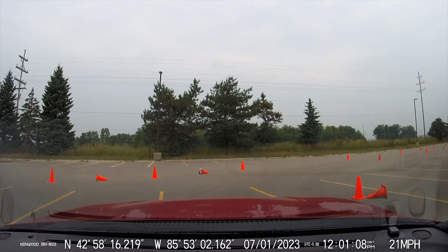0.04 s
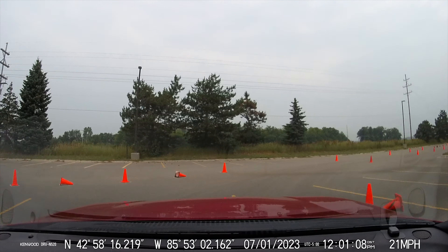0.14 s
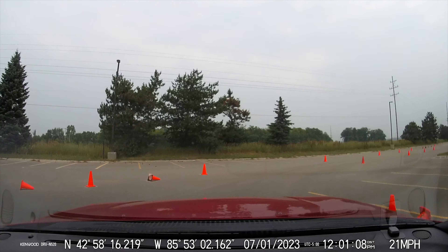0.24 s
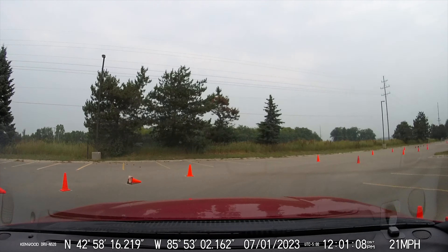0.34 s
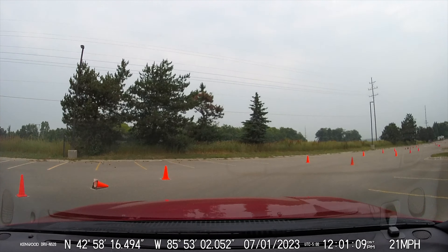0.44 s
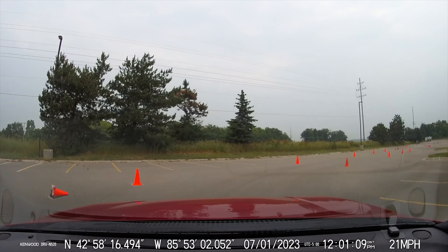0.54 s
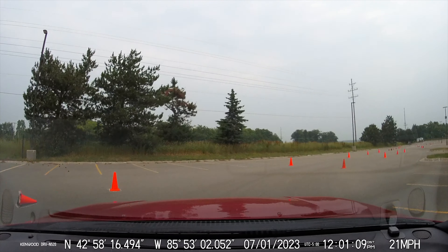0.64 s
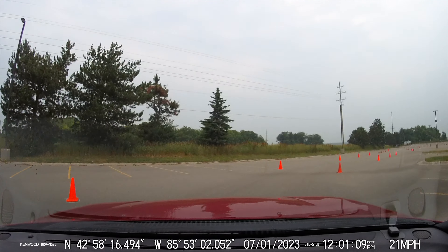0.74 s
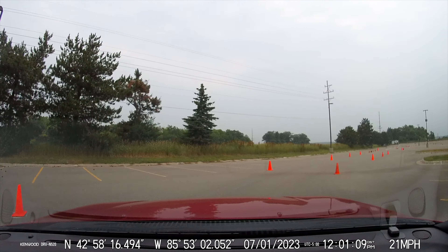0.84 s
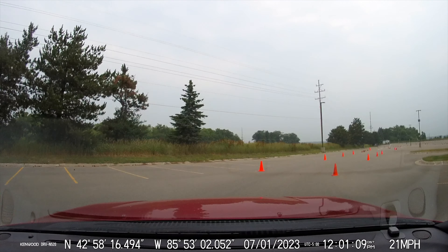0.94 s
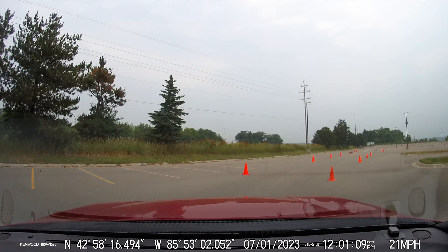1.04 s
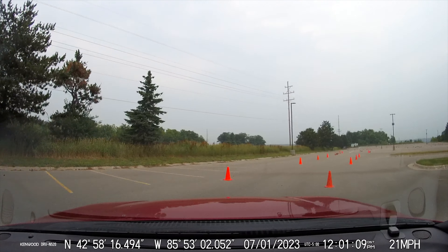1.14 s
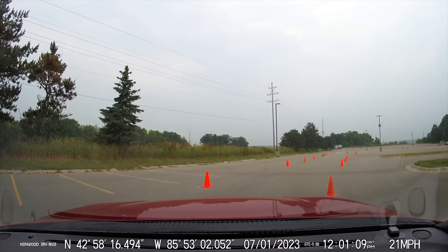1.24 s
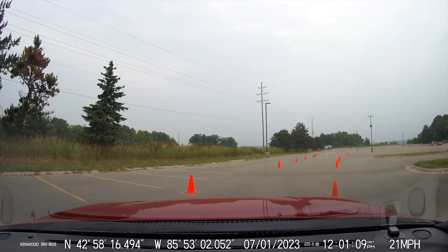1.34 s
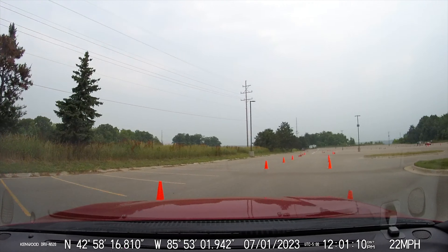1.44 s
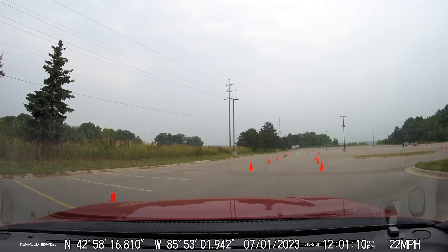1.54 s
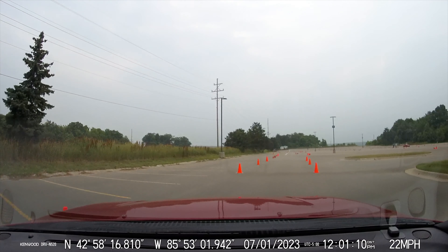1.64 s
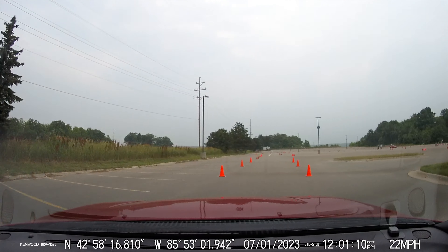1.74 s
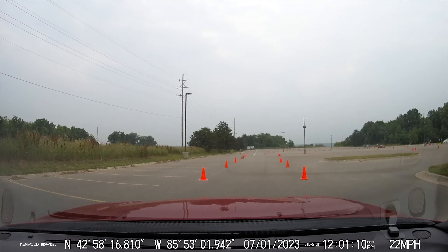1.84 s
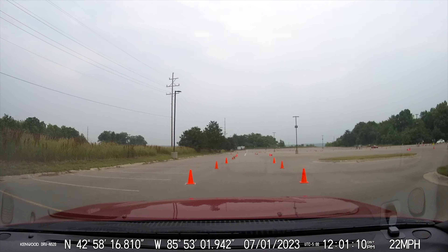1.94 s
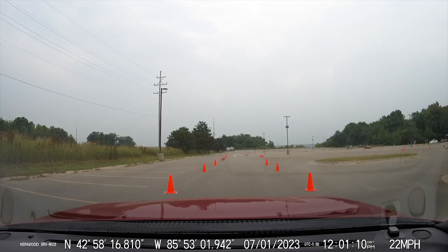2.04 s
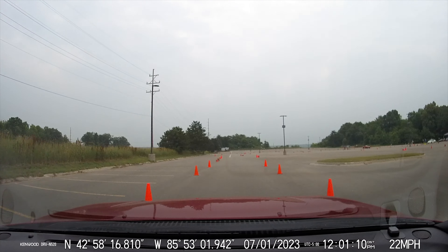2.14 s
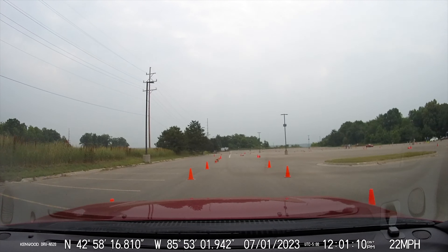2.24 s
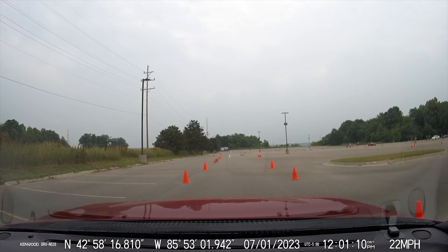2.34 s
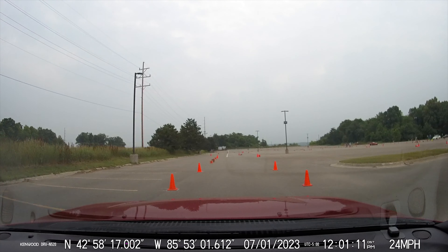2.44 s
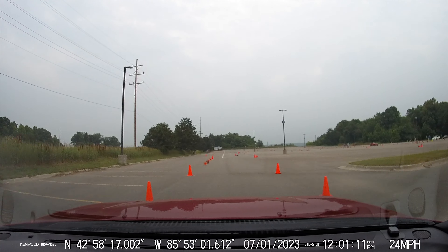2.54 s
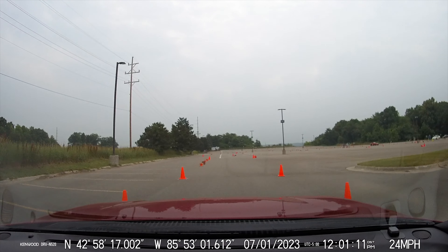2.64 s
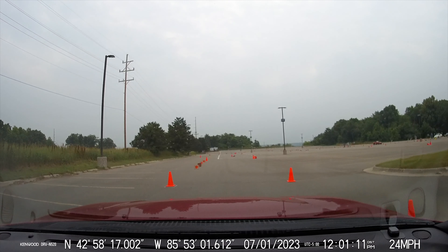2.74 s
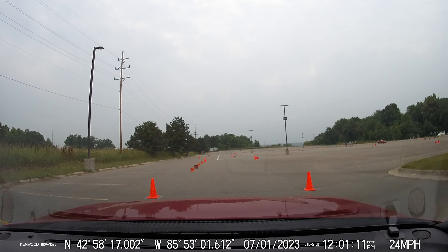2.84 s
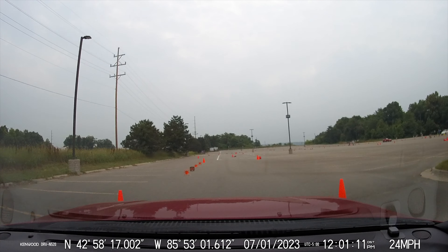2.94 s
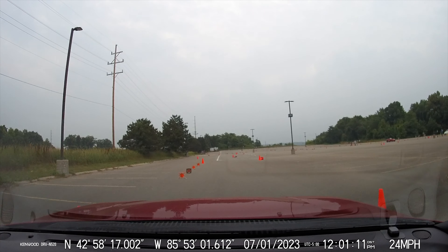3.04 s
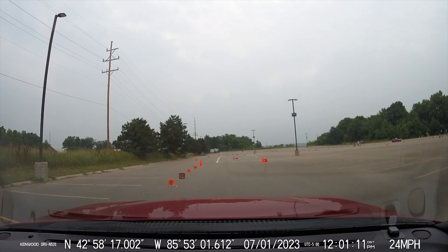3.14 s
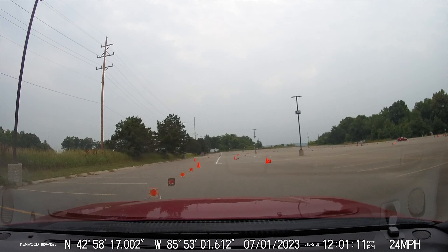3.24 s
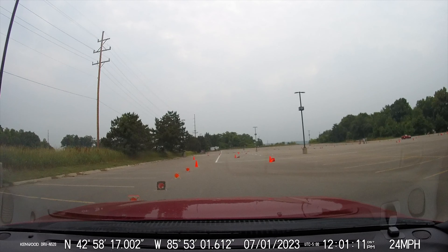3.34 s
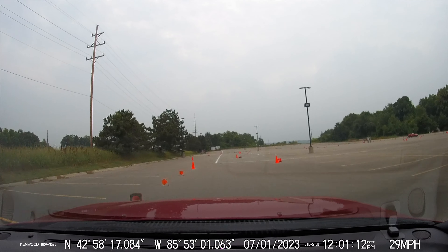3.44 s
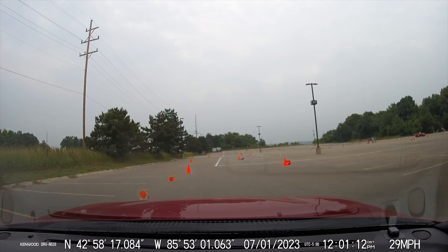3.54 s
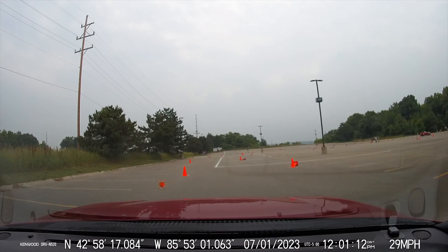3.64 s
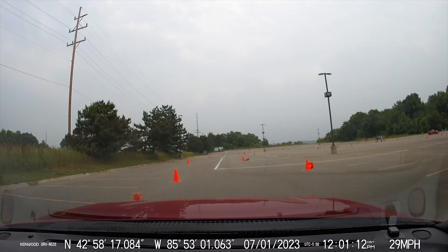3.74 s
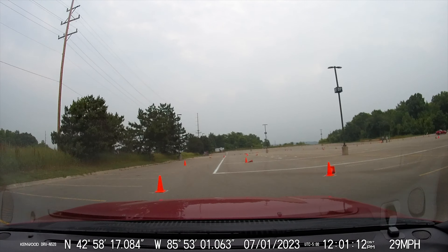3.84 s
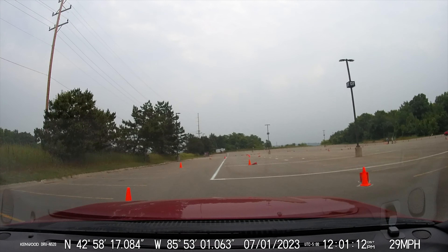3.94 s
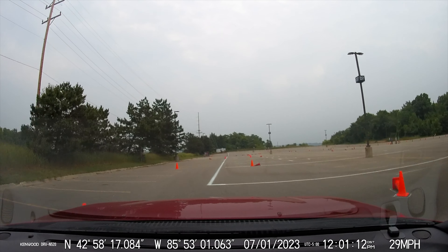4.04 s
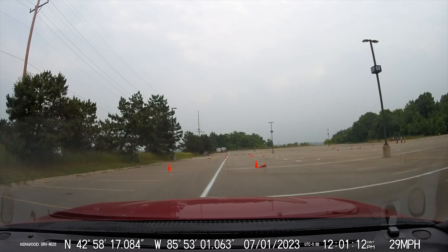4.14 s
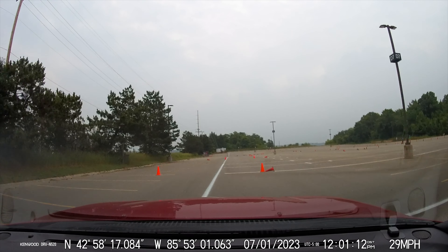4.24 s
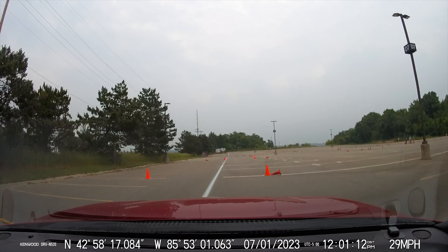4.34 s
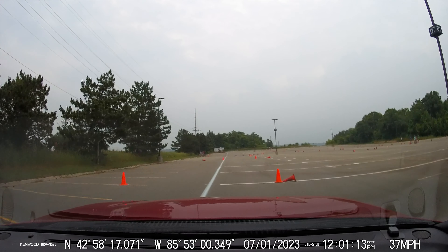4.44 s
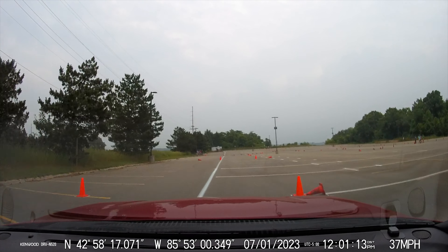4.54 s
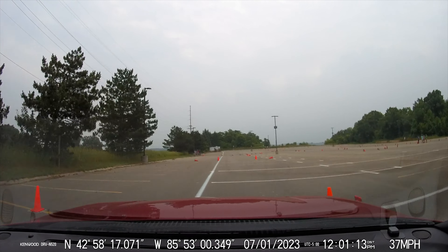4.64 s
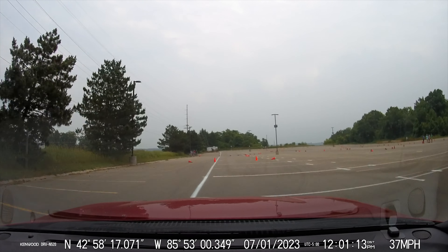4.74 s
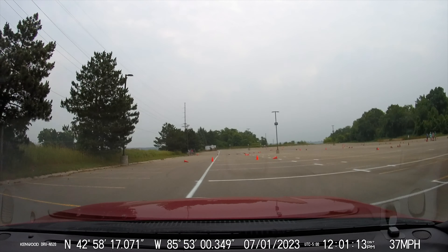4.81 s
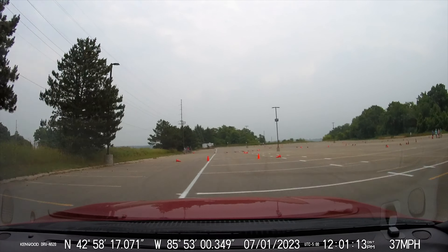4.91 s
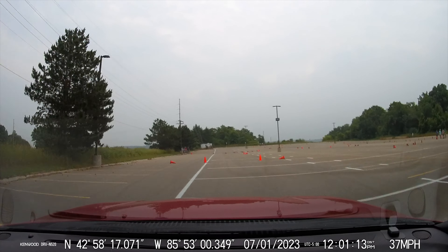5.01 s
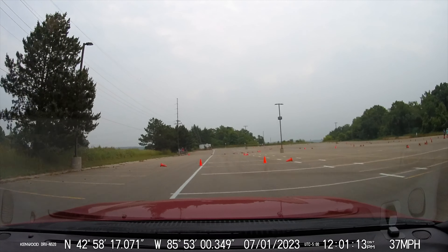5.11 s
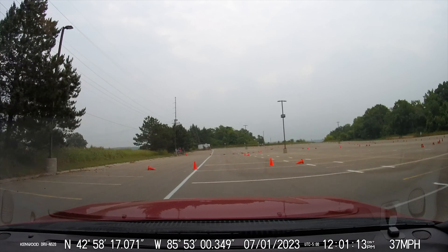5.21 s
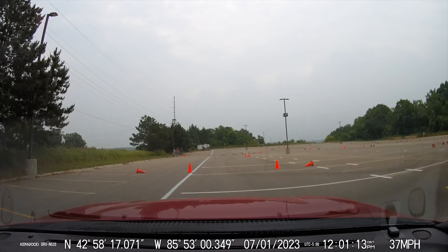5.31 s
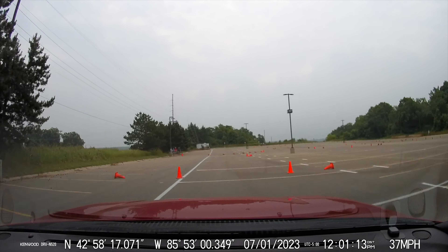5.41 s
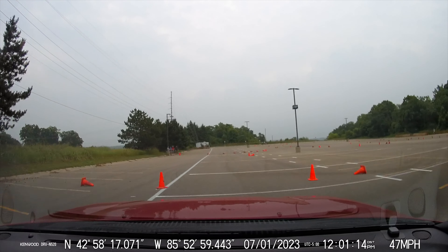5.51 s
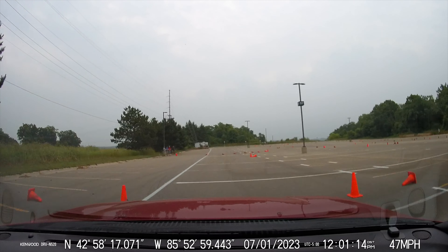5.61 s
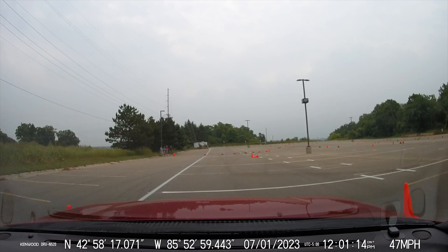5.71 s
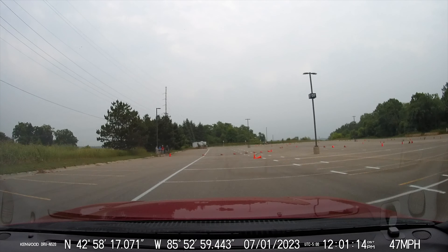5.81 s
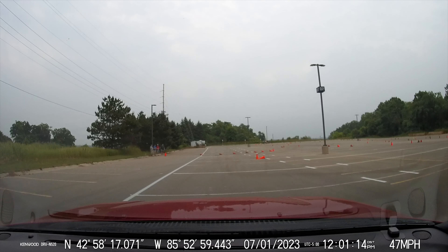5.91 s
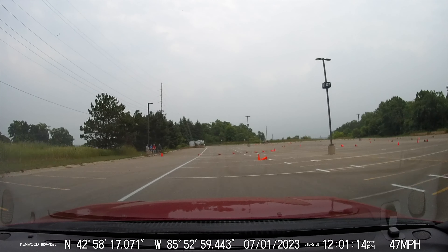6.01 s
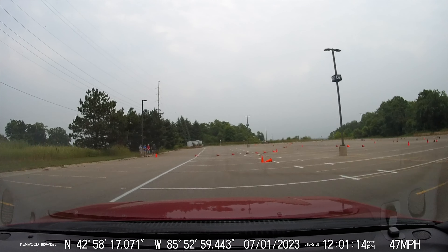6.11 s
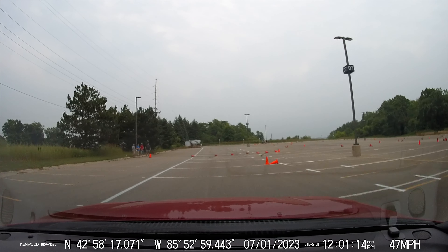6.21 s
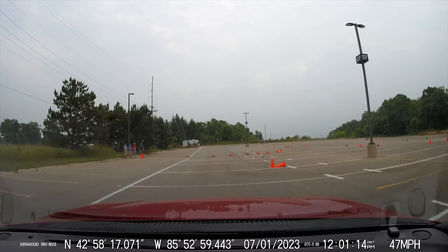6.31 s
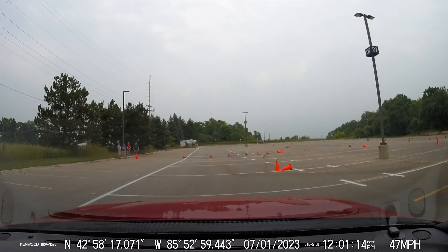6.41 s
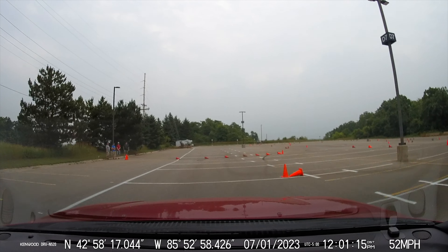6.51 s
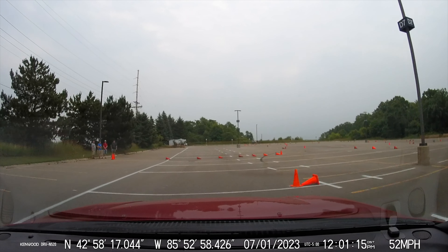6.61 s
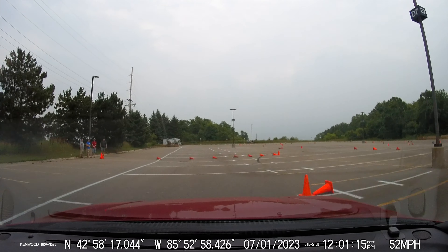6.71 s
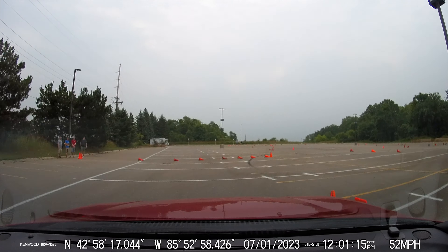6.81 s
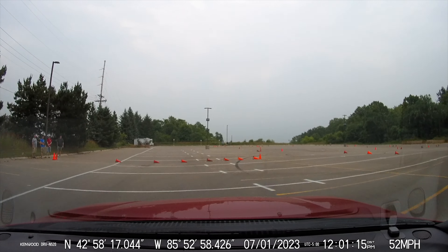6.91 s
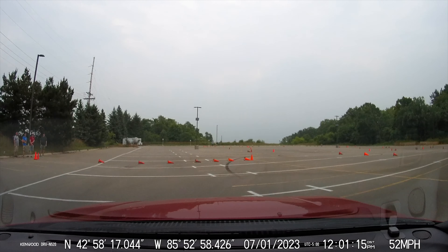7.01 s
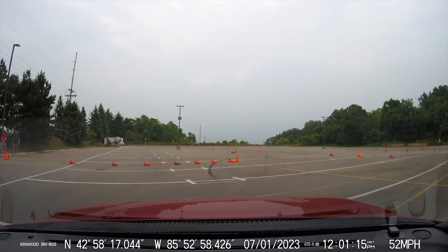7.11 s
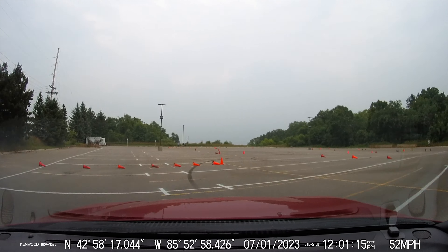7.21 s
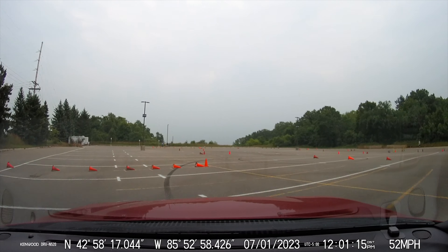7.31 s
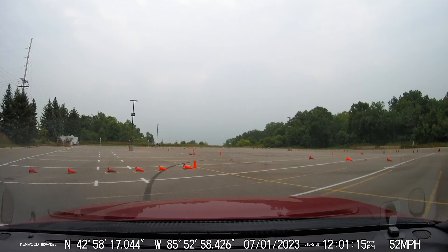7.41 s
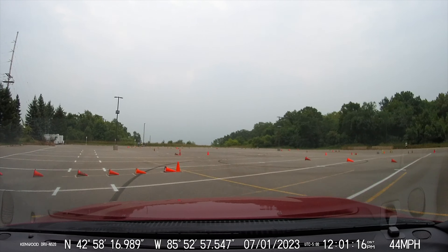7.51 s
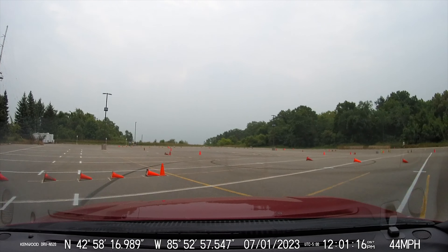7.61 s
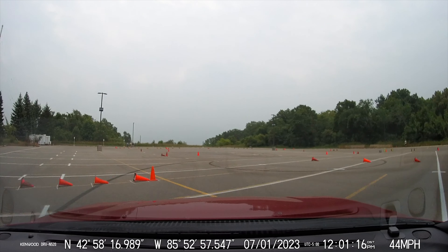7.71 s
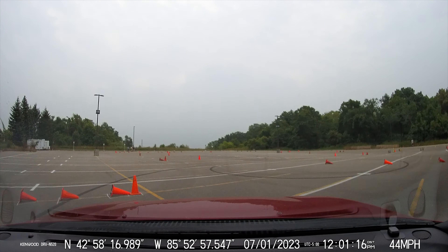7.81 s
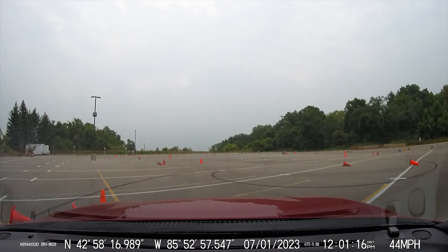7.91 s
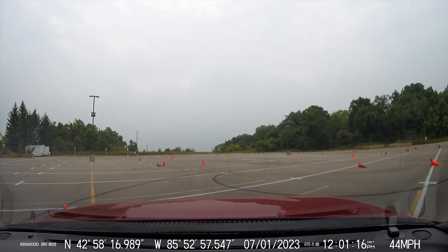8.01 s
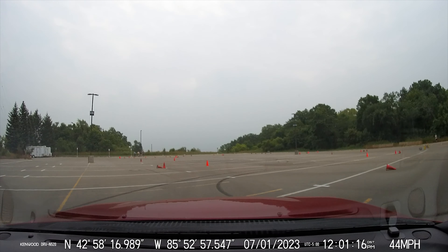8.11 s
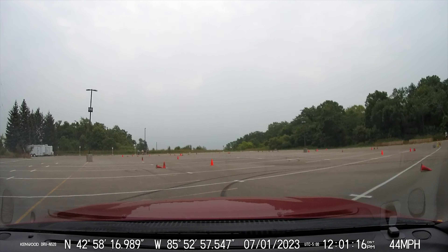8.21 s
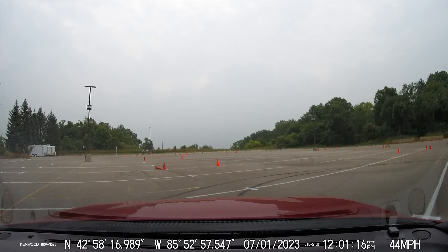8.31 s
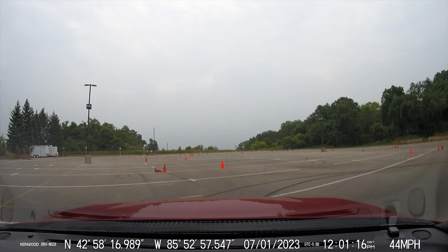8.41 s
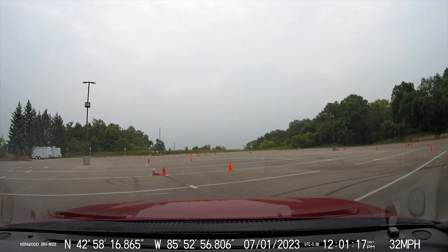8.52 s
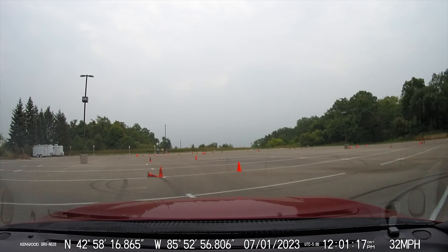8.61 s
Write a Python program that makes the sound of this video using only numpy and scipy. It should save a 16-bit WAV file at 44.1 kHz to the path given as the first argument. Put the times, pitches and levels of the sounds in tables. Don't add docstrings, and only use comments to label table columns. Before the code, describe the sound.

Inside a turbocharged six-cylinder car on a parking lot cone course, heard close and dull from the dashboard. At 0 s the engine drones low over road rumble, with a short tire chirp, small plastic ticks and light trim knocks. From about 0.8 to 2.1 s the tires squeal thinly and unevenly through a corner, with a faint mechanical whine. From 2.3 s the engine pulls hard, its growl rising steadily to a peak near 4.7 s, with faint compressor breath. At 4.8 s the throttle lifts with a soft bump, a rush of air and a faint falling whistle. The engine sinks on overrun, with panel knocks around 6 s. From 6.7 to 7.8 s the tires screech loudly under braking, several rough tones overlapping. Throttle blips jump up from 7.3 s to the end near 8.6 s, amid sharp knocks and ticks.

```python
import sys
import numpy as np
from scipy import signal
from scipy.fft import rfft, irfft, next_fast_len
from scipy.io import wavfile

SR = 44100
rng = np.random.default_rng(int(sys.argv[2]) if len(sys.argv) > 2 else 0)


def digitize_waveform(pressure):
    field = np.atleast_2d(pressure).T
    bounded = np.clip(field, -1, 1)
    quanta = np.round(bounded * 32767).astype(np.int16)
    wavfile.write(sys.argv[1], SR, quanta)


def volts(x):
    e = np.asarray(x, float) / 20
    return 10 ** e


N = 381906

# (time [s], speed [turns/s])
CRANK = [(0.0, 40.25), (0.36, 42.79), (1.09, 43.29), (1.18, 44.97), (2.08, 54.7), (2.32, 53.9),
         (2.98, 63.5), (3.59, 72.85), (4.71, 93.18), (4.96, 90.11), (5.47, 87.55), (5.81, 83.86),
         (6.02, 78.8), (6.36, 69.04), (6.76, 61.76), (6.92, 55.71), (8.19, 57.15), (8.66, 64.11)]


def rms_one(x):
    return x / np.sqrt(np.mean(np.abs(x) ** 2) + 1e-20)


def in_time(rows):
    s, *columns = np.transpose(rows)
    return [np.interp(np.arange(N) / SR, s, c) for c in columns]


def at_hz(points, hz):
    points_hz, level_db = np.transpose(points)
    return np.interp(np.log(hz), np.log(points_hz), level_db)


def swells(rows):
    t = np.arange(N) / SR
    return sum(size * np.interp(t, [s - rise, s, s + hold, s + hold + fall], [0, 1, 1, 0])
               for s, size, rise, hold, fall in rows)


def drift(rate_hz):
    r = np.exp(-2 * np.pi * rate_hz / SR)
    return rms_one(signal.lfilter([1], [1, -2 * r, r * r], rng.standard_normal(N + SR))[SR:])


def shifted(slow, samples):
    return np.roll(np.r_[slow, slow[::-1]], samples)[:N]


def band(x, low_hz, high_hz):
    return signal.sosfilt(signal.butter(2, [low_hz, high_hz], "band", fs=SR, output="sos"), x)


def dulled(x, cut_hz):
    return signal.sosfilt(signal.butter(6, cut_hz, fs=SR, output="sos"), x)


def turning(hz):
    return np.exp(2j * np.pi * np.cumsum(hz) / SR)


def narrow_noise(hz, width_hz, tone):
    waver = rms_one(tone + drift(width_hz) + 1j * drift(width_hz))
    return np.sqrt(2) * np.real(waver * turning(hz))


def burst(t60_s, rise_s):
    t = np.arange(round(.12 * SR)) / SR
    return rng.standard_normal(len(t)) * volts(-60 * t / t60_s) * (1 - np.exp(-t / rise_s))


def crank():
    # (time at the top [s], size [turns/s], rise [s], hold [s], fall [s])
    surges = [(2.419, 0.739, 0.125, 0.004, 0.362), (3.477, 2.625, 0.091, 0.005, 0.151),
              (4.748, -1.6, .014, .001, .05), (4.805, -8.2, 0.075, 0.012, 0.075),
              (4.84, 2.3, .02, 0.001, .02), (4.863, -2.8, .02, 0.001, .09),
              (6.981, -2.13, 0.062, 0.012, 0.077), (7.323, 5.858, 0.119, 0.189, 0.081),
              (7.754, 5.952, 0.109, 0.01, 0.189), (8.026, 4.486, 0.139, 0.007, 0.138),
              (8.35, 6.498, 0.128, 0.028, 0.141)]
    return in_time(CRANK)[0] + swells(surges)


def loads_db():
    # (time [s], firing orders [dB], other orders re firing [dB], tilt [dB/octave])
    load = [(0, -46, -14.5, -3.5), (1.1, -54, -17.5, 0), (1.25, -51.5, -9.5, -.5), (2.0, -48, -10.5, 0.5),
            (2.3, -45.5, -9.5, -1), (2.85, -45.5, -8.5, 3), (3.6, -39, -14, -2), (4.25, -42.5, -8, -1.5),
            (4.7, -49.5, -3.5, -3), (4.85, -52, -12.5, 3.5), (5.75, -54.5, -12, 1), (6.0, -45, -18, -5.5),
            (6.6, -60, -16, -3), (7.2, -54.5, -12.5, -4.5), (7.45, -49, -10, 5.5), (7.75, -47.5, -11, 0),
            (8.05, -45.5, -24, -4.5), (8.35, -47, -11.5, 2.5)]
    # (time [s], level [dB], rise [s], hold [s], fall [s])
    fuel_cuts = [
        (7.6, -17, 0.073, 0.0061, 0.11),
        (8.1, -15, 0.11, 0.037, 0.24),
    ]
    # (time [s], level [dB], rise [s], hold [s], fall [s])
    stumbles = [
        (3.5, 10, 0.18, 0.23, .2),
        (5.3, 15, 0.74, 0.14, 0.23),
        (7.3, 15.5, 0.11, 0.066, 0.063),
        (8.4, -17, .2, .3, 0.098),
    ]
    half_orders_db = -7
    firing, uneven, tilt = in_time(load)
    firing = firing + swells(fuel_cuts)
    whole = firing + uneven
    return firing, whole, whole + half_orders_db + swells(stumbles), tilt


def engine(waver_db, spread_rad):
    # (multiple of crank speed [1], level [dB])
    engine_orders = [(1.0, 21), (1.5, 9.5), (2.0, 17.5), (2.5, 2.5), (3.0, 15), (3.5, -3), (4.0, 5.5),
                     (4.5, 10), (5.0, 11.5), (5.5, 5), (6.0, 0.63), (6.5, -7), (7.0, 2), (7.5, 0), (8.0, 4),
                     (8.5, -8.5), (9.0, -2.5), (9.5, -3), (10.0, -4), (10.5, -3.5), (11.0, 2.5),
                     (11.5, -19.5), (12.0, -11), (12.5, -5.5), (13.0, -1)]
    # (frequency [Hz], level [dB])
    cabin = [(40.0, -37), (70.0, -10), (110.0, -6), (175.0, 5), (230.0, -6), (290.0, 0), (370.0, 9),
             (430.0, 3), (500.0, 9.5), (600.0, 8), (700.0, 8.5), (850.0, -3), (1000.0, 13), (1200.0, 3.5)]
    # (frequency [Hz], width [Hz], level [dB])
    cabin_modes = [(108, 9.9, 4.5), (125.8, 14, -14), (381.2, 3.1, 4.5), (478.8, 11, 7.5), (559, 1.7, 5.5),
                   (608, 18, 2), (717.6, 10, 7.5), (785, 14, 2.5)]
    # (multiple [1], level [dB])
    coasting = [(1, 3), (3, 2), (4, 9), (5.5, -5), (6, 0), (7, 12), (8, 4), (9, 6), (12, 2)]
    coasting_s = 4.82, 6.9
    # (multiple [1], time [s], level [dB], half length [s])
    order_swells = [(1, 6.1, -10, .2), (1.5, 4.5, 12, .2), (1.5, 5.7, -10, .25), (2, 3.2, -4, .15),
                    (3, 3.96, -6.5, 0.13), (3, 4.65, -2.5, 0.28), (3.5, 4.5, 12, 0.37), (3.5, 4.5, 9, .2),
                    (4, 2.5, 7.5, 0.24), (4, 2.8, 4.5, .15), (4, 4.1, 5.5, 0.21), (4, 5.31, 7, 0.19),
                    (4, 6.45, 14, 0.24), (4.5, 2.2, -4, 0.22), (4.5, 5.2, -5.5, .3), (5, 2.4, -12, 0.25),
                    (5, 4.25, -9.5, .15), (5, 4.4, 9.5, 0.28), (6, 3.6, 3, .1), (6, 4.05, 5, .06),
                    (6, 4.55, 7, 0.19), (6, 4.8, -12, 0.16), (6, 7, 12.5, .12), (6.5, 3.1, 9, .4),
                    (6.5, 4.1, 8, .3), (7, 2.7, -12, 0.18), (7, 5.8, -6.5, .2), (8, 2.5, -4, .2),
                    (8, 3.5, 3.5, 0.22), (8, 5.6, -5, 0.25), (8, 6.9, 8, .2), (8.5, 3.1, 10, 0.43),
                    (9, 3.41, -12, 0.14), (9, 4.8, 8.5, 0.1), (9.5, 3.5, 5, .2), (10, 3.5, 8, 0.41),
                    (10, 4.0, 16.5, .12), (10, 4.6, 14, .12), (11, 2.6, -11, .15), (12, 2.5, 5, 0.28),
                    (9, 7.85, 7, .15), (8, 7.45, -7, .15), (9, 7.6, -14, 0.2), (10, 7.8, 12, 0.16),
                    (8, 8.45, -8, .12), (4.5, 4.42, -9, .15), (9, 7.32, 4, 0.13), (3, 4.9, 4, 0.15),
                    (4, 6.1, 5, 0.073), (3, 6.0, -3.5, 0.11)]

    speed = crank()
    angle = 2 * np.pi * np.cumsum(speed) / SR
    loads = loads_db()
    wandering = drift(.35)
    wavers = [drift(3.1) + 0.8 * drift(25.0) for _ in range(3)]
    coarse = np.arange(0, N, 64)
    coarse_s = coarse / SR
    shut = np.interp(coarse_s, np.repeat(coasting_s, 2) + [0, .1, 0, .1], [0, 1, 1, 0])
    out = 0
    for k, (order, level_db) in enumerate(engine_orders):
        half_steps = round(2 * order)
        hz = order * speed[coarse]
        cabin_db = at_hz(cabin, hz)
        for mode_hz, width_hz, db in cabin_modes:
            cabin_db = cabin_db + db / (1 + (2 * (hz - mode_hz) / width_hz) ** 2)

        kind = 0 if half_steps % 6 == 0 else 1 + half_steps % 2
        load_db = loads[kind][coarse] + dict(coasting).get(order, 0) * shut
        load_db = load_db + loads[3][coarse] * np.log2(max(order / 3, 1))
        for multiple, s, db, half_s in order_swells:
            if multiple == order:
                load_db = load_db + db * np.exp(-((coarse_s - s) / half_s) ** 2)

        lag = np.interp(np.arange(N), coarse, spread_rad * shifted(wandering, 47000 * k)[coarse])
        waver = shifted(wavers[k % 3], 9000 * k)[coarse]
        rough_db = waver_db * (1 + 1.1 * shut) * np.sqrt(half_steps) * waver
        gain = np.interp(np.arange(N), coarse, volts(level_db + load_db + cabin_db + rough_db))
        out = out - gain * np.cos(order * angle + lag)
    return np.sqrt(2) * out


def squeal(spans, width_hz, tone, wander_hz, chatter_db, strands, octave_db):
    out, t = 0, np.arange(N) / SR
    for rows in spans:
        hz, level_db = in_time(rows)
        live = np.clip(np.minimum(t - rows[0][0], rows[-1][0] - t) / .02, 0, 1)
        slip_hz = hz + wander_hz * drift(14.1)
        slip = volts(chatter_db * drift(23.0)) * narrow_noise(slip_hz, width_hz, tone)
        ribs = 0
        for ratio, db in strands:
            rib_hz = ratio * hz + 1.5 * wander_hz * drift(6.0)
            ribs = ribs + volts(db + 2.4 * drift(1.1)) * narrow_noise(rib_hz, width_hz, tone)
        octave = volts(octave_db) * band(narrow_noise(2 * hz, 2.1 * width_hz, .2), 2000, 3600)
        out = out + live * volts(level_db) * (dulled(slip + ribs, 2100) + octave)
    return dulled(out, 4100)


def glide_tracks():
    # (start [s], length [s], from [Hz], to [Hz], level
    # [dB])
    glides = [(0.151, 0.55, 2000, 2016, -61), (0.636, 0.013, 2430, 2320, -48),
              (1.872, 0.033, 1765, 1710, -36), (1.916, .045, 1740, 1800, -38),
              (1.885, .012, 2523, 2530, -49), (1.925, 0.015, 1950, 2020, -46.5),
              (1.93, .012, 2520, 2520, -50), (6.831, .1, 2966, 2840, -50), (6.841, .1, 2430, 2470, -58.5),
              (7.08, 0.027, 2474, 2400, -56), (7.165, .05, 1454, 1457, -33), (7.171, .13, 2330, 2365, -51),
              (7.224, 0.058, 1423, 1390, -27), (7.239, 0.029, 1318, 1310, -29),
              (7.33, 0.028, 1411, 1430, -29.5), (7.362, 0.054, 1719, 1685, -49),
              (7.453, 0.068, 1628, 1593, -36), (7.46, 0.054, 1716, 1690, -39.5),
              (7.52, 0.032, 1363, 1350, -28), (7.544, 0.038, 1565, 1503, -31.5),
              (7.549, .05, 2353, 2330, -52), (7.605, 0.043, 1433, 1426, -26.5),
              (7.658, .04, 2430, 2450, -60), (7.673, 0.042, 1420, 1387, -35.5)]
    # (start [s], length [s], from [Hz], to [Hz], level [dB])
    low_glides = [
        (6.84, .03, 1089, 1100, -35),
        (6.94, .1, 1095, 1135, -26),
        (7.108, 0.058, 1130, 1085, -24),
        (7.245, .045, 1130, 1136, -25.5),
        (7.479, 0.031, 1147, 1130, -27),
        (7.589, 0.041, 1150, 1138, -25.5),
    ]
    edge_s, edge_db = .025, -18
    shapes = []
    for s, length, from_hz, to_hz, db in glides + low_glides:
        end = s + length
        shapes.append([(s - 1.2 * edge_s, from_hz, -90), (s - edge_s, from_hz, db + edge_db),
                       (s, from_hz, db), (end, to_hz, db),
                       (end + edge_s, to_hz, db + edge_db), (end + 1.2 * edge_s, to_hz, -90)])
    high, low = shapes[:len(glides)], shapes[len(glides):]
    return [sum(high[k::4], []) for k in range(4)] + [sum(low, [])]


def tyres():
    # (time [s], pitch [Hz], level [dB])
    slides = [
        [(0.06, 1290, -53), (0.085, 1300, -42), (0.15, 1274, -38), (0.175, 1250, -54)],
        [(.78, 1171, -51), (.9, 1283, -40.5), (1.0, 1162, -49.5), (1.2, 1185, -45), (1.5, 1170, -46),
         (1.74, 1222, -37), (1.98, 1240, -37), (2.1, 1320, -36), (2.16, 1350, -49)],
        [(6.69, 1178, -44), (6.8, 1232, -33.5), (6.94, 1197, -27.5), (7.1, 1210, -26), (7.33, 1188, -29.5),
         (7.44, 1216, -30), (7.62, 1191, -29.5), (7.715, 1234, -32.5), (7.8, 1255, -46)],
    ]
    # (time [s], level [dB])
    grabs = [(.9, 2.5), (1.185, 11), (1.225, -3), (1.255, 6), (1.29, 19.5), (1.325, 16), (1.35, 9.5),
             (1.485, 22), (1.41, 4), (1.59, -6), (1.79, -4.5), (1.76, 10), (1.815, 9), (1.89, 13.5),
             (1.95, 8.5), (1.92, 0.5), (1.98, -4), (2.008, 11), (2.05, 3.5), (2.1, 0.5), (6.76, 3.5),
             (6.888, 4.5), (6.936, 7), (6.99, -2), (7.05, 4.5), (7.087, 5.5), (7.14, -7.5), (7.172, 7),
             (7.25, -6), (7.308, 5.5), (7.338, 2.5), (7.41, 4), (7.44, 1), (7.49, -1), (7.525, 6.5),
             (7.555, -4), (7.69, 4), (7.718, 1)]
    rise_s, fall_s = .03, .035
    grabs_db = swells([(s, db, rise_s, 0, fall_s) for s, db in grabs])
    main = squeal(slides[:2], width_hz=45, tone=2.6, wander_hz=9, chatter_db=0.0,
                  strands=[(.91, -17), (1.07, -10)], octave_db=-42)
    main += squeal(slides[2:], width_hz=55, tone=1.9, wander_hz=11, chatter_db=1.0,
                   strands=[(.9, -9), (1.09, -7), (1.3, -31)], octave_db=-35)
    others = squeal(glide_tracks(), width_hz=45, tone=1.7, wander_hz=10, chatter_db=1.5,
                    strands=[(1.06, -11)], octave_db=-42.0)
    return volts(grabs_db) * main + others


def knocks(body_t60_s, bright_t60_s):
    # (time [s], peak [dB], pitch [Hz], bright part [dB])
    hits = [(0.268, -20.5, 1020, -80), (0.461, -19, 970, -52), (0.465, -15.5, 1140, -51),
            (2.3925, -14, 1024, -54.5), (2.841, -10.5, 587, -57), (4.203, -18.5, 526, -63),
            (4.914, -14, 600, -71), (6.0065, -16, 1003, -47), (6.012, -8.5, 1015, -60),
            (6.022, -17, 1160, -66), (6.736, -15, 1210, -74), (6.981, -14, 760, -71.5),
            (7.93, -11, 633, -69), (7.935, -23, 1130, -71), (8.0705, -6.5, 994, -59),
            (8.0706, -24, 1360, -62), (8.528, -39, 555, -53.5)]
    out, t = np.zeros(N + SR), np.arange(round(.12 * SR)) / SR
    for s, peak_db, hz, bright_db in hits:
        ringing = np.sin(2 * np.pi * hz * t) * volts(-60 * t / body_t60_s) * 1.4 * (1 - np.exp(-t / 0.0012))
        bounce = 0.24 * np.roll(ringing, round(0.0075 * SR))
        thud = 1.5 * band(burst(0.057, 0.0015), 420, 1300)
        body = dulled(ringing + bounce + thud, 1600)
        rattle = burst(bright_t60_s, .0005) + 1.2 * burst(.012, .0003)
        rattle = dulled(band(rattle, 1900, 4000), 3700)
        at = round((s - .0005) * SR)
        out[at:at + len(t)] += volts(peak_db - 2.0) * body + volts(bright_db + 13.5) * rattle
    return out[:N]


def thumps(length_s):
    # (time [s], peak [dB], pitch [Hz])
    bumps = [
        (4.8, -35, 60),
        (5.74, -44, 110),
        (7.575, -34, 95),
        (8.15, -33, 85),
        (8.36, -55, 60),
    ]
    t = np.arange(N) / SR
    return sum(volts(db) * np.exp(-((t - s) / length_s) ** 2) * np.sin(2 * np.pi * hz * t) for s, db, hz in bumps)


def relief_valve():
    # (time [s], whistle [Hz], level [dB])
    relief = [(4.86, 6450, -130), (4.9, 6450, -70), (4.93, 6520, -68), (5.0, 6370, -73), (5.07, 6130, -75),
              (5.13, 6050, -84), (5.18, 5990, -105)]
    hz, level_db = in_time(relief)
    octave = volts(-22.5) * narrow_noise(2 * hz, width_hz=250, tone=.1)
    side_jet = volts(-12.5) * narrow_noise(.91 * hz, width_hz=90, tone=.1)
    whistle = narrow_noise(hz, width_hz=110, tone=1.1)
    is_open = np.arange(N) / SR < relief[-1][0]
    return volts(level_db) * is_open * (whistle + octave + side_jet)


def whine():
    # (crank speed [turns/s], first [dB], second [dB], third overtone [dB])
    whine_levels = [(40, -100, -114, -118), (46, -85, -110, -110), (52, -92, -108, -114),
                    (56, -102, -106, -116), (62, -97, -103, -130), (67, -90, -90, -130),
                    (73, -91, -87, -130), (82, -88, -88, -130), (88, -85, -89, -130), (93, -92, -95, -130)]
    # (time [s], level [dB])
    pump_levels = [(0, -47.5), (.6, -52), (1.0, -67), (1.45, -38), (1.75, -55.5), (2.0, -68)]
    whine_order, pump_order = 89.2, 15.8
    speed = crank()
    turns, *levels = np.transpose(whine_levels)
    out = volts(in_time(pump_levels)[0]) * turning(pump_order * speed).real
    for k, db in enumerate(levels, 1):
        hz = k * whine_order * speed
        gain = volts(np.interp(speed, turns, db) + 2 * drift(20.0))
        out = out + gain * turning(hz).real * (hz < 15.8e3)
    return np.sqrt(2) * out


def turbo():
    # (time [s], pitch [Hz], level [dB])
    spool = [(2.5, 8700, -112), (3.2, 9600, -102), (4.0, 11300, -100), (4.7, 12800, -100),
             (4.8, 12800, -125)]
    hz, level_db = in_time(spool)
    return volts(level_db) * narrow_noise(hz, width_hz=200, tone=0)


def ticks():
    # (time [s], peak [dB], duller part [dB])
    clicks = [(0.0297, -61, 14), (0.069, -77, 16), (0.091, -76, 18), (0.1645, -77, 3), (0.179, -77.5, 1),
              (0.188, -71, 14), (0.2496, -78, 3), (0.4015, -73.5, 1), (0.4381, -68.5, 16), (0.4603, -60, 7),
              (0.5067, -68.5, 18), (0.6647, -77, 3), (0.69, -72.5, 8), (0.7158, -80, 2), (0.9091, -79.5, 8),
              (1.0336, -67.5, 5), (1.2735, -76, 3), (2.139, -69, 7), (2.1884, -67.5, 4), (2.2297, -70, 12),
              (2.6354, -78, 2), (2.729, -65.5, 1), (3.179, -63.5, 12), (3.23, -66, 6), (3.39, -67, 13),
              (3.4564, -69.5, 9.5), (3.499, -68, 1), (3.571, -79.5, 7.5), (4.5243, -70.5, 6.5),
              (4.778, -76, 27), (4.8312, -66.5, 5), (4.857, -66.5, 10), (4.951, -66, 7), (6.908, -76, 20),
              (7.316, -65.5, -3), (7.646, -75.5, 3), (7.7408, -73, 11), (7.7676, -67.5, 0),
              (7.8094, -70.5, 0), (7.8687, -69, 9), (8.2143, -67, 13), (8.224, -70, 12), (8.3426, -77, 5),
              (8.3577, -67, 12), (8.3915, -66, 13), (8.404, -74, 9), (8.4386, -71, 16), (8.5257, -73.5, 28),
              (8.531, -73, 28), (8.538, -73.5, 22), (8.564, -70, 6)]
    faint_count, faint_db = 6, -79
    faint = [(at * N / SR, faint_db - 4 * less, 6) for at, less in rng.random((faint_count, 2))]
    out = np.zeros(N + SR)
    for s, peak_db, duller_db in clicks + faint:
        rub = .43 < s < .52
        puff = burst(.03 * (1 + 1.9 * rub), .0006)
        treble = volts(1.5) * band(puff, 10500, 15800)
        middle = volts(-10.0 + 5.5 * rub) * band(puff, 4800, 10500)
        duller = volts(duller_db + 3) * dulled(band(puff, 2800, 4500), 4800)
        out[round(s * SR):][:len(puff)] += volts(peak_db) * (treble - middle + duller)
    return out[:N]


def roar_db():
    # (time [s], level [dB])
    road = [(0, -5), (.4, -5.5), (1.25, -5), (1.5, -2.5), (2.25, 1), (2.8, 1), (4.7, 4.5), (4.8, 7),
            (5.0, 4.5), (5.5, 3.5), (6.75, 2), (7.0, -4.5), (7.4, -1.5), (8.0, 0.5), (8.66, 3)]
    # (time [s], level [dB], rise [s], hold [s], fall [s])
    rush_swells = [(.25, 3, 0.28, 0.36, 0.15), (1.3, 3, 0.13, 0.2, 0.29), (1.758, 5, 0.26, 0.27, 0.25),
                   (2.551, 4.5, 0.081, 0.65, 0.66), (5.195, 4.5, 0.24, 0.8, 0.32),
                   (6.851, 4.5, 0.085, 0.47, 0.31)]
    # (time [s], level [dB], rise [s], hold [s], fall [s])
    dump_rush = [(4.785, 9.4, 0.046, 0.062, 0.33)]
    # (time [s], level [dB], rise [s], hold [s], fall [s])
    dump_hiss = [(4.797, 9.001, .06, 0.24, .3)]
    rumble_db, rush_db, hiss_db = -1, -5, -9
    rush_db_per_turn, hiss_db_per_turn = 0.1963, 0.1874
    faster = crank() - CRANK[0][1]
    rush = rush_db + rush_db_per_turn * faster + swells(dump_rush + rush_swells)
    hiss = hiss_db + hiss_db_per_turn * faster + swells(dump_hiss)
    return np.array([np.full(N, rumble_db), in_time(road)[0], rush, hiss])


def roar(patchy_db, burn_db):
    bands_hz = [70, 500, 3000, 6500]
    # (frequency [Hz], density [dB/Hz])
    roar_colour = [(25, -87), (45, -73.5), (80, -79), (140, -66.5), (250, -64.5), (450, -62.5), (800, -64),
                   (1300, -66.5), (1480, -76), (2300, -89), (2700, -100.5), (3900, -104), (5000, -122)]
    # (frequency [Hz], density [dB/Hz])
    hiss_colour = [(5000, -122), (7000, -133), (8800, -134), (9800, -130), (11000, -132), (12700, -124),
                   (14200, -130), (15400, -130), (15750, -123)]
    size = next_fast_len(N)
    hz = np.arange(1, size // 2 + 2) * SR / size
    colour = volts(at_hz(roar_colour + hiss_colour[1:], hz)) * np.sqrt(SR / 2)
    coloured = rfft(rng.standard_normal(size)) * colour
    together, own, levels = drift(6.2), drift(26.0), roar_db()
    throb = turning(3 * crank()).real
    out = 0
    for k, centre_hz in enumerate(20 * 2 ** np.arange(0, 10, 1 / 3)):
        place = np.interp(np.log(centre_hz), np.log(bands_hz), np.arange(4))
        below = min(int(place), 2)
        level_db = levels[below] + (place - below) * (levels[below + 1] - levels[below])
        flicker_db = patchy_db * (together + shifted(own, 11000 * k))
        throb_db = burn_db * throb * (centre_hz > 300)
        share = np.clip(1 - np.abs(3 * np.log2(hz / centre_hz)), 0, 1)
        out = out + volts(level_db + flicker_db + throb_db) * irfft(coloured * share, size)[:N]
    return out


def scene():
    car = engine(waver_db=0.33, spread_rad=2.4) + tyres()
    trim = knocks(body_t60_s=0.02, bright_t60_s=0.084) + thumps(length_s=0.015) + ticks()
    air = relief_valve() + turbo() + roar(patchy_db=1.0, burn_db=0.0)
    return (car + trim + whine() + air)[None]


def roll_off(x):
    return signal.sosfilt(signal.butter(12, 15800, fs=SR, output="sos"), x)


def record(dry):
    n = np.arange(N)
    fade = np.minimum(np.minimum(n, n[::-1]) / 22, 1)
    mix = dry * np.sin(np.pi / 2 * fade) ** 2
    return roll_off(mix)


dry = scene()
out = record(dry)
digitize_waveform(out)
```